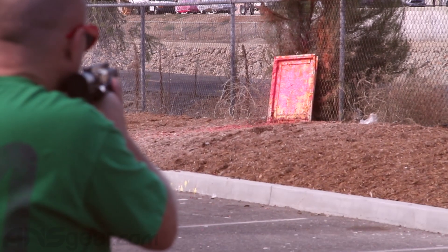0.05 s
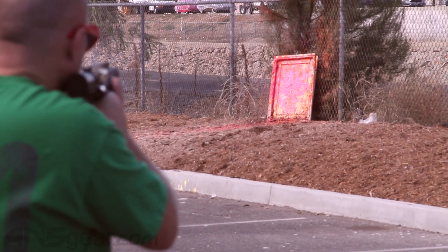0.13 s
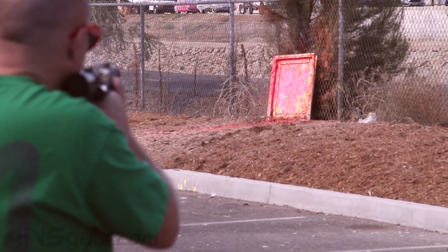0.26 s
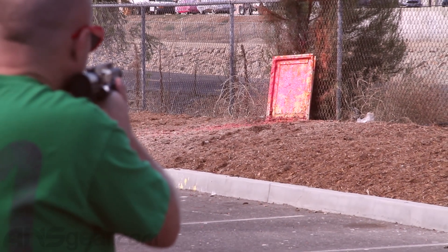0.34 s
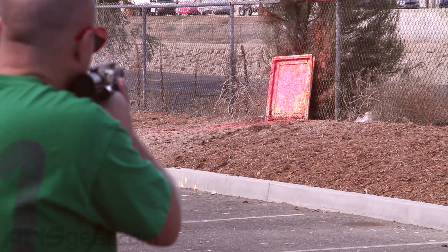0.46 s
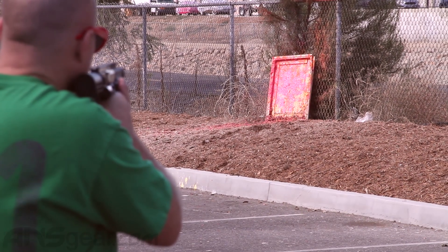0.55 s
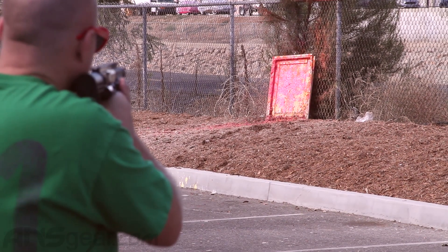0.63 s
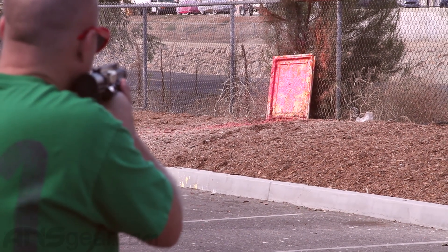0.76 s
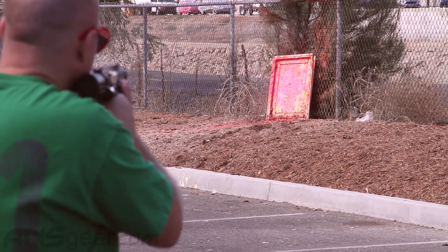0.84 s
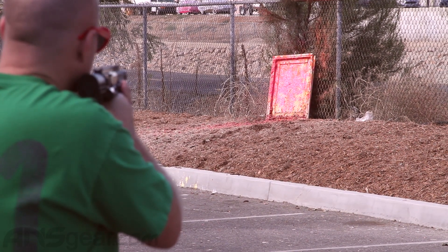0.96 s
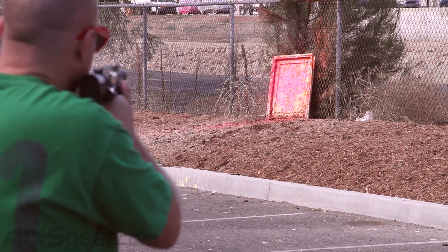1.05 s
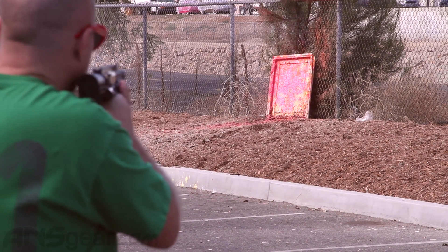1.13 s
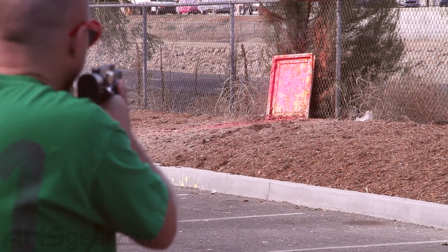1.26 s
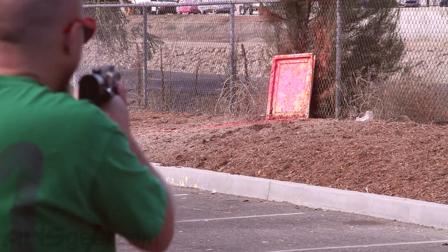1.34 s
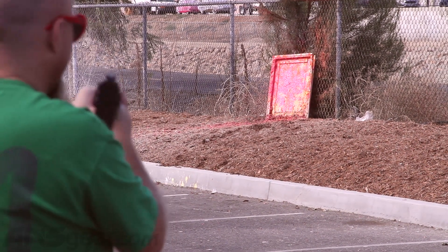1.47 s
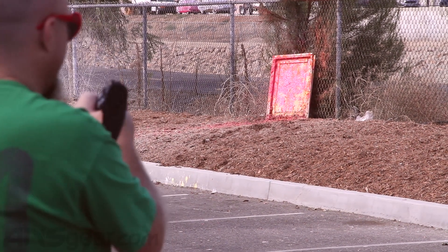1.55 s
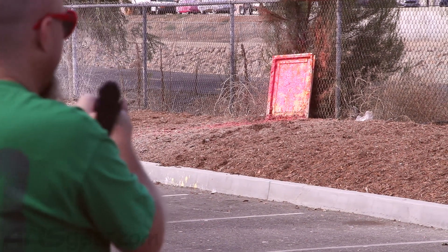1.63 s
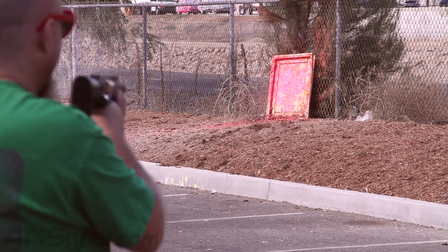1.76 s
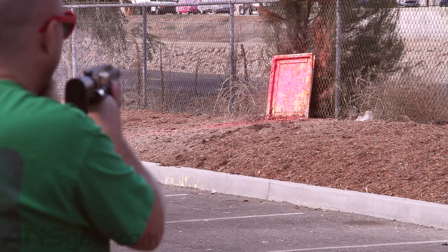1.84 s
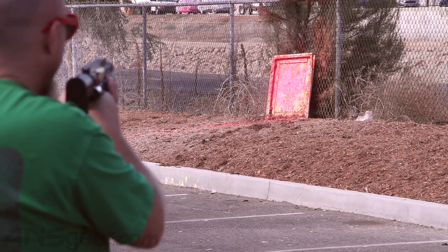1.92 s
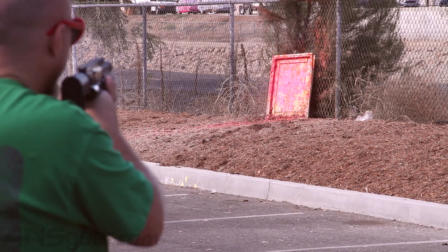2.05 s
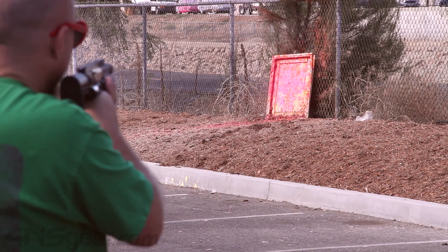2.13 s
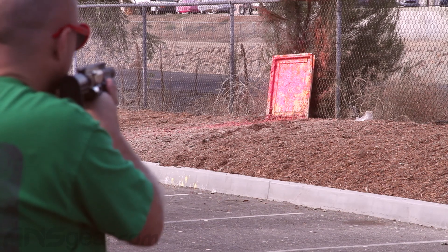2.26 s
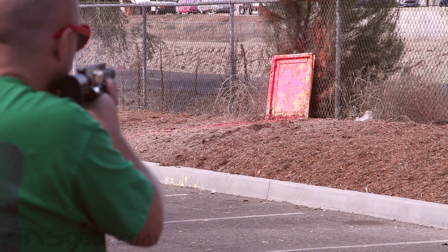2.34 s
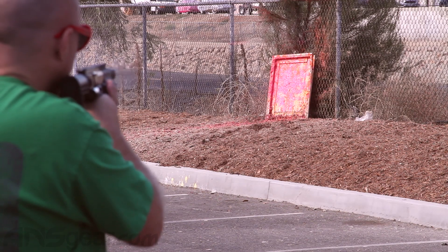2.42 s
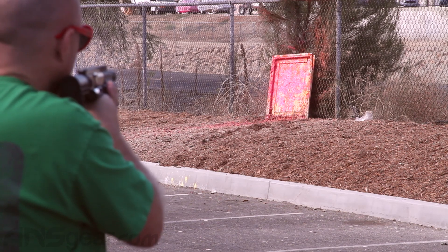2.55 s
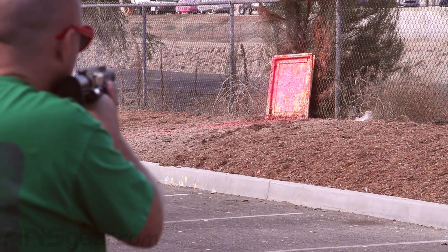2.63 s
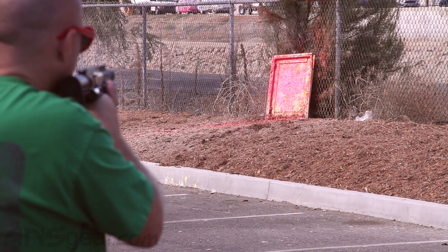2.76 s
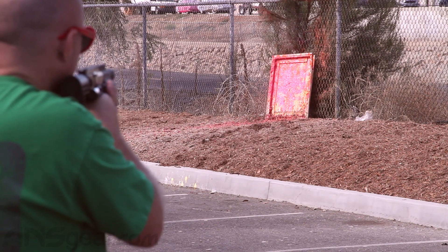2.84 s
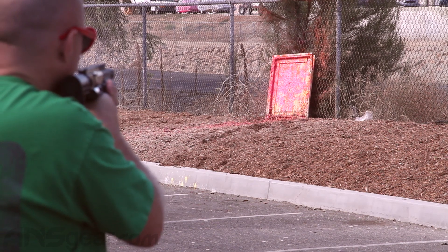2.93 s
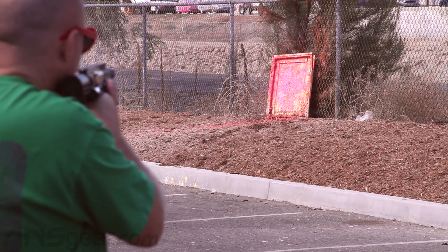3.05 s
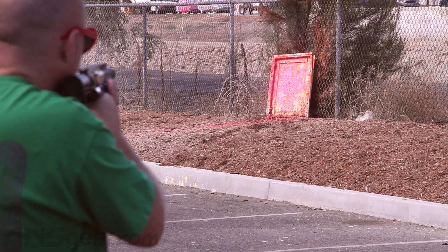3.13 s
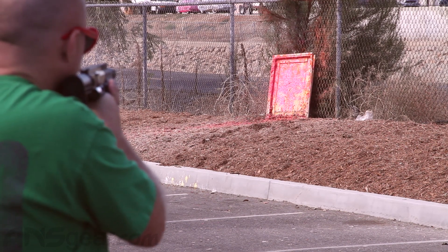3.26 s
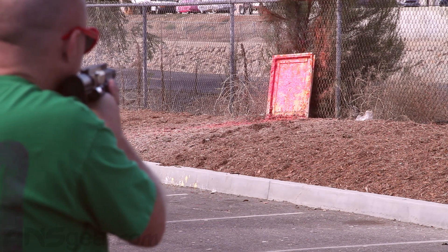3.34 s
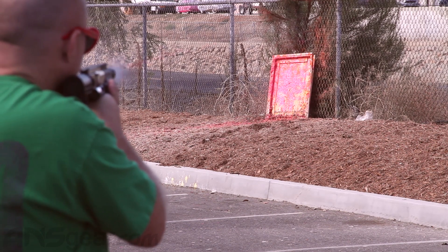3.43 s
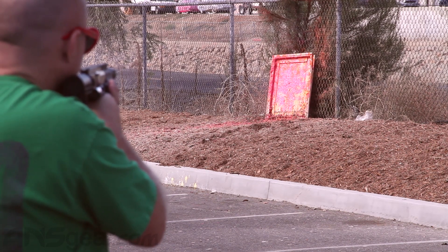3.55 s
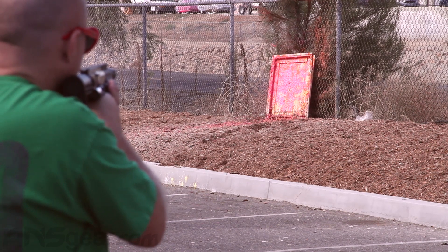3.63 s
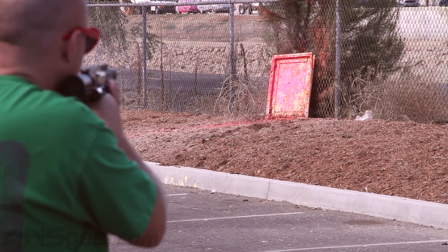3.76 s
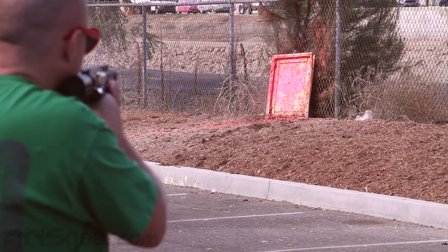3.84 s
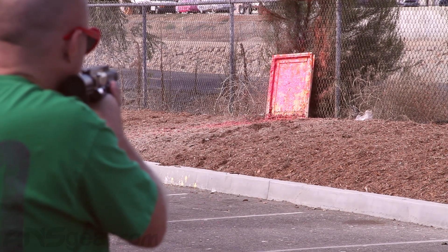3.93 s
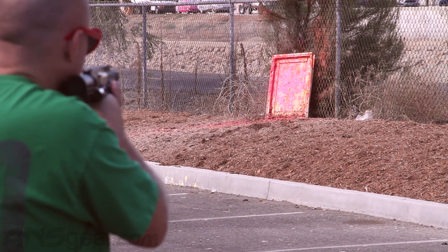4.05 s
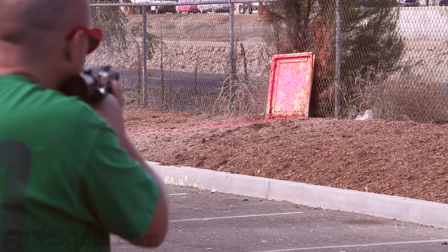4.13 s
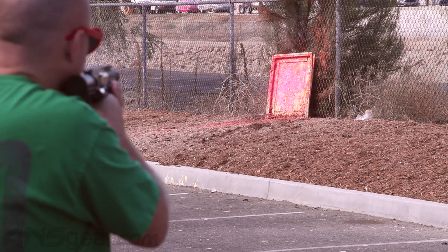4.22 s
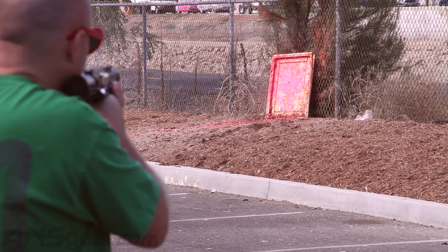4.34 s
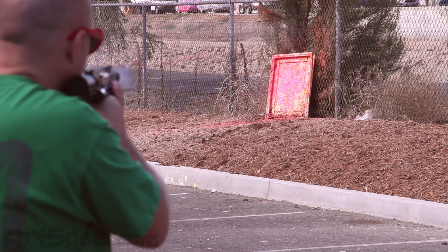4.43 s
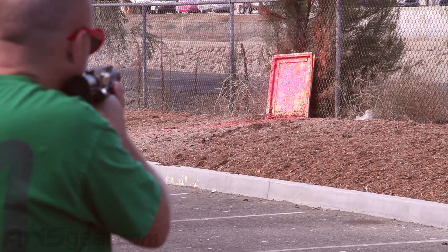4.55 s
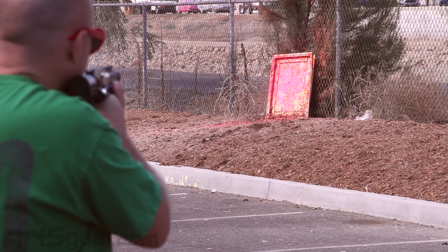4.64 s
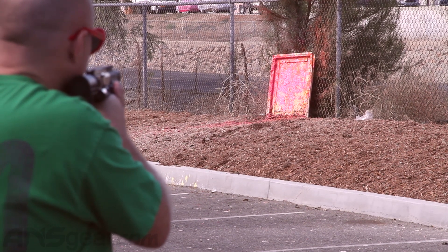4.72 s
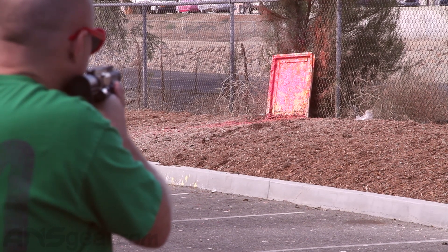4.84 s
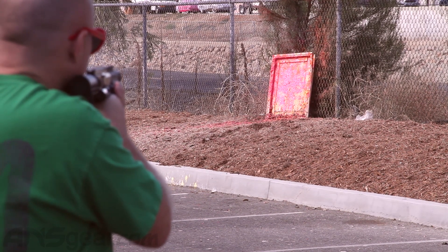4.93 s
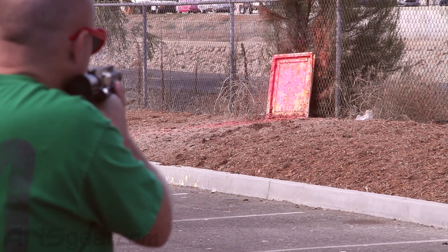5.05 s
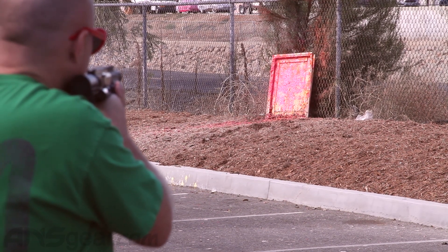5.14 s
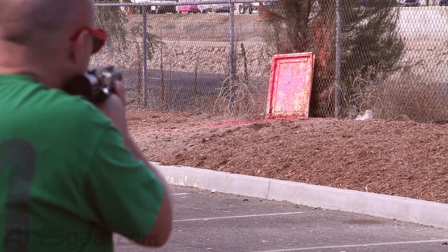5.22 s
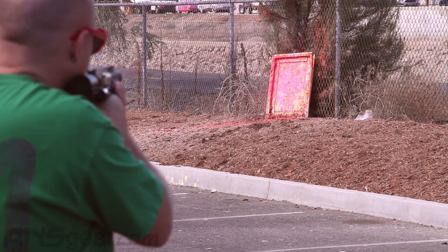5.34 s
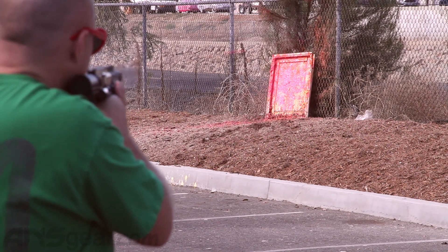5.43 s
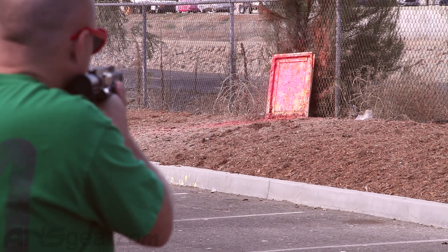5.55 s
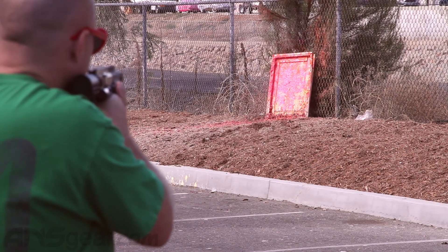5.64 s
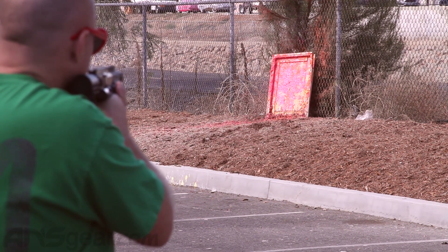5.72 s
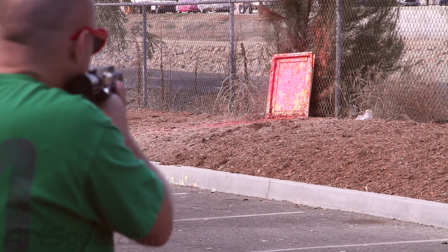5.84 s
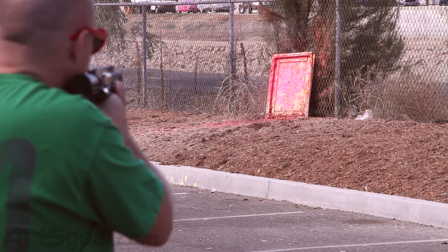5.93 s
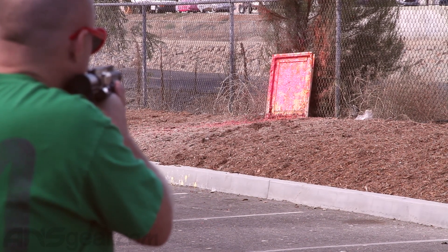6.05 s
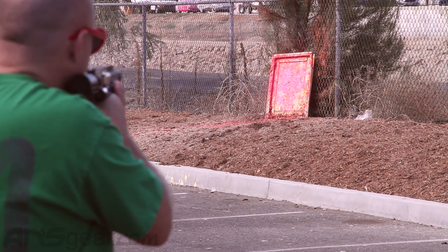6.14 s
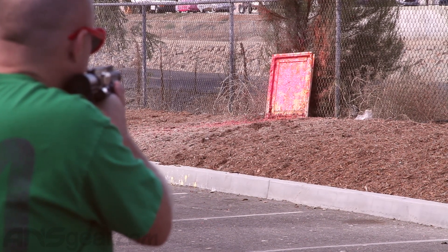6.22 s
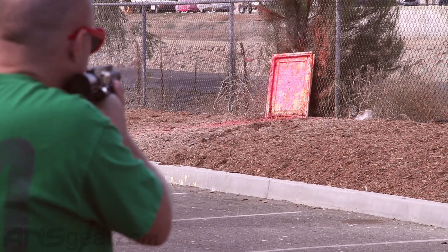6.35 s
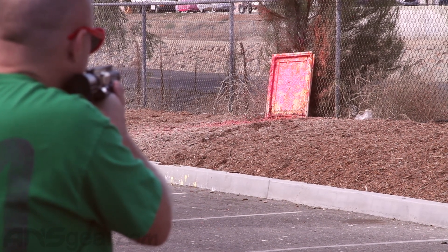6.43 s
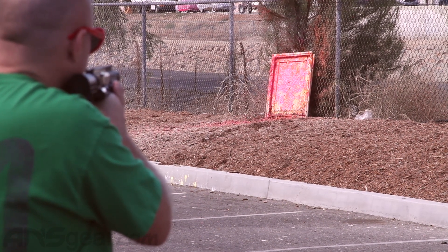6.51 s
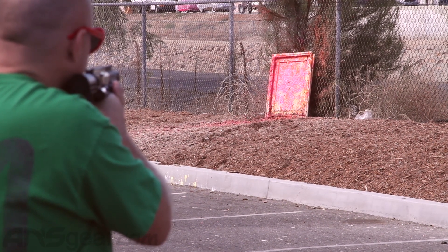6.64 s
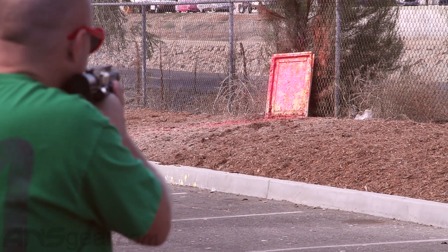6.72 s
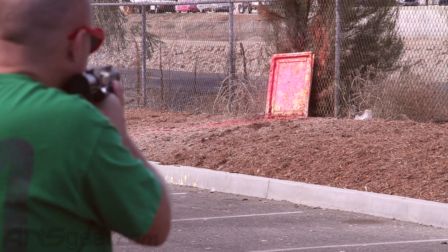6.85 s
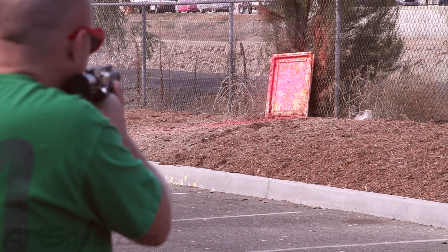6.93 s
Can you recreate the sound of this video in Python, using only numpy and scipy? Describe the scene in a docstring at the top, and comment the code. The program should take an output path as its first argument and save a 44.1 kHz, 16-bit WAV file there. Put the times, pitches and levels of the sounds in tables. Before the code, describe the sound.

Metal clicks, then five loud paintball pops about a second apart, with mechanical resets and far splats over light wind and traffic.

```python
"""Close to the microphone, a lever clicks as a CO2 paintball gun is readied, over wind and far traffic.
Then five shots cross a car park to a board by a fence. Each is a trigger tick, a valve leak and a blast
of gas that overloads the input; the bolt knocks, the action resets with two clicks, and far off the
ball splats. Distant walls return faint ticks, and a small bird calls once."""
import sys
import numpy as np
from scipy import signal
from scipy.fft import rfft, irfft
from scipy.io import wavfile
from scipy.ndimage import uniform_filter1d

SR = 44100
rng = np.random.default_rng(int(sys.argv[2]) if len(sys.argv) > 2 else 0)


def wav_out(sig):
    """Save sig, one row per channel (or a flat mono array), as 16-bit PCM at SR to the path in sys.argv[1]."""
    wavfile.write(sys.argv[1], SR, np.round(np.clip(np.atleast_2d(sig).T, -1, 1) * 32767).astype(np.int16))


N = 307818

# Levels in the tables are relative: each layer adds its own gain.
# Spectra of the place. Each row: frequency in Hz, level in dB.
WIND_SPECTRUM = [(8.8, -42.5), (15, -4), (38, 5.5), (81, 3), (210, -10.5), (309, -21), (506, -28),
                 (600, -30), (780, -52.5), (1320, -120)]
GUST_SPECTRUM = [(60, -11), (160, 3.5), (260, -4), (450, -14), (900, -35), (2000, -72)]
TRAFFIC_SPECTRUM = [(100, -4), (400, -3), (700, 2.5), (1100, 5.5), (1600, -1.5), (2200, -14.5), (3200, -24),
                    (5000, -32), (7500, -32.5), (9500, -28.5), (11500, -39.5), (15500, -46), (17000, -58)]
TYRE_SPECTRUM = [(1200, -20.5), (2500, 1), (3800, -4.5), (4600, -11.5), (7000, -26), (12000, -44)]
SPLAT_SPECTRUM = [(150, -9), (450, -3), (900, -2), (1600, 1), (3000, -6), (4200, -13.5), (7000, -18.5),
                  (9300, -1.5), (11000, -21.5), (16000, -40)]
SPRAY_SPECTRUM = [(400, 4.5), (1500, 1), (3000, -2.5), (4500, -10), (7500, -10), (9500, -2.5), (11000, -22),
                  (13000, -24), (16000, -42)]
# Spectra of cloth, clicks and gas at the gun. Each row: frequency in Hz, level in dB.
CLOTH_SPECTRUM = [(1000, -12), (3000, -11), (7000, -13.5), (8800, -2.5), (9900, 0), (11500, -11.5),
                  (15500, -25.5), (17000, -45.5)]
CLICK_SPECTRUM = [(200, -35.5), (600, -21), (900, -11.5), (1170, 4), (1420, -3), (1750, -0.5), (2300, -8),
                  (2750, -8.5), (3350, -0.5), (3800, -10), (4400, -12), (5400, -12.5), (6800, -13.5),
                  (8800, -3), (10600, -13), (15500, -28), (17000, -59.5)]
JET_SPECTRUM = [(60, -18), (300, -5.5), (900, -4.5), (1600, 1.5), (2300, -2.5), (3200, -2.5), (4500, -10),
                (7200, -11), (8400, -3), (9300, 2.5), (10000, -1), (10900, -15.5), (14000, -19.5),
                (17000, -36.5)]
NEAR_SCATTER_SPECTRUM = [(60, -3.5), (200, -17.5), (400, -8), (700, -3), (1300, 3.5), (2200, -4),
                         (3200, -5), (4500, -9), (7200, -11), (9400, -1), (11000, -12), (15500, -27),
                         (16500, -58)]  # the jet off the nearby surroundings
FAR_SCATTER_SPECTRUM = [(100, -7.5), (600, -3), (1200, 0), (2200, -7), (4000, -11.5), (7000, -15.5),
                        (9400, -4), (10800, -20), (13000, -37.5), (16000, -49.5)]  # the jet back from fence and trees
# Wind at the microphone and tyre hiss from the far road. Each row: time in seconds, level in dB.
WIND_LEVELS = [(0.0, -41), (1.48, -42), (1.65, -39), (2.39, -36), (2.55, -41), (3.05, -43), (3.62, -40),
               (4.24, -42), (4.61, -35), (4.84, -39), (6.36, -34), (6.98, -43)]
TYRE_LEVELS = [(0, -76), (1.1, -71), (1.6, -75), (3, -78), (3.8, -69), (5.3, -65.5), (6.1, -71),
               (6.98, -71)]
# Gusts on the microphone; sleeve and hands on the gun.
# Each row: centre in seconds, level in dB, half length in seconds.
GUST_SWELLS = [(1.7, -48, .1), (2.15, -49, .029), (2.29, -38, .04), (4.05, -48, .04), (4.25, -48, .06),
               (4.72, -44, .04), (5.08, -49, .06), (5.61, -41, .045), (5.93, -44, .05), (6.07, -39.5, .05),
               (6.82, -47, .06)]
CLOTH_SWELLS = [(.22, -62.5, 0.065), (1.075, -66, 0.025), (1.44, -70, .04), (1.499, -47.5, 0.025),
                (1.778, -62, 0.026), (1.903, -70, .06), (2.17, -76.5, .12), (2.859, -64, 0.066)]
# The car park's reverberation. Each row: frequency in Hz, seconds to fall 60 dB.
CAR_PARK_DECAY = [(100, .35), (500, .4), (1200, 0.5), (3500, 0.26), (9500, 0.17), (15000, 0.33)]
# The bird's falling note. Each row: time in seconds, pitch in Hz, level in dB.
BIRD_NOTE = [(4.107, 5450, -80), (4.125, 5264, -65), (4.143, 4850, -58), (4.160, 4310, -74.5),
             (4.190, 3536, -79.5)]
# Balls bursting on the far board. Each row: start in seconds, then level, treble and spray in dB.
BOARD_HITS = [(2.807, -17.5, 0, -77), (3.846, -16, -3.5, -64), (4.838, -4, -21.5, -50.5),
              (5.8, -9.5, -25.5, -56.5), (6.6835, -8.5, -18.5, -54.5)]
# What rings in the gun. Each row: frequency in Hz, level in dB, seconds to fall 60 dB.
METAL_MODES = [(1150, 2.5, 0.083), (2350, -19, .1), (2850, -21.5, .16), (3330, -7.5, 0.066),
               (3850, -25.5, .26), (4900, -23.5, .12), (6370, -25, .14), (7720, -20, 0.16),
               (8600, -21, .09)]  # thin metal parts
SPRING_MODES = [(2665, -3, .32), (3838, 0, .46), (6315, -7, .4), (8355, -4, .34), (8640, -9, .6)]  # the sear's spring
FRAME_MODES = [(746, -13, 0.01), (1168, -1, 0.036), (1310, -7.5, 0.013), (1390, -5.5, 0.015),
               (1820, -6, 0.013), (2638, -11.5, .016), (3058, -7.5, 0.018)]  # the frame under the bolt
BARREL_MODES = [(115, 4, 0.017), (242, -2.5, 0.016), (376, 7.5, 0.027), (498, 7, 0.033), (551, 6.5, .026),
                (717.7, 5, .035), (1484, -2, 0.044), (1870, -0.5, 0.046)]  # air in the barrel
# Lever strokes. Each row: time of the snap in seconds; level, treble and ring in dB;
# contact decay and travel in seconds; slack tick, catch tick and rebound in dB.
LEVER_STROKES = [(.027, -33, 5, -25, .0014, .02, -60, -60, -60),
                 (.245, -23, -20, -21, .0025, .066, -45, -33, -42),
                 (.497, -26, -7, -24, .0015, .061, -50, -50, -52),
                 (.732, -18.5, -15, -18, .0016, .037, -39, -32, -40),
                 (.849, -20, -15.5, -18, .0007, .031, -35, -42, -32),
                 (.993, -16.5, -13.5, -18, .0025, .027, -30, -35, -37),
                 (1.078, -18.5, -17, -15, .0009, .025, -35, -35, -28),
                 (1.202, -14, -1.5, -20, .001, .022, -28, -32, -40),
                 (1.277, -22.5, -8, -11, .0021, .025, -39, -37, -24),
                 (1.353, -2.5, 4, -30, .0008, .01, -60, -55, -10),
                 (1.39, -3.5, 4, -32, .0025, .01, -60, -55, -22),
                 (1.544, -29.5, -6, -22, .0021, .02, -60, -60, -55)]
# Gas flow, starting with the valve's leak. Each row: seconds from the blast, level in dB.
JET_LEVELS = [(-.0075, -59.5), (-.006, -21), (-.003, -23), (0, -14), (.001, -0.5), (.006, 0.5),
              (0.014, 3.5), (.015, -7), (.02, -11), (.032, -25), (.06, -34), (.12, -67.5)]
# The shots. Each row: start in seconds, level in dB, barrel hoot in dB, its rise in Hz, its length in
# seconds; bolt return delay and first bounce gap in seconds, bolt level in dB; trigger lead, release
# delay and latch delay after the release in seconds; latch level and treble in dB.
FIRINGS = [(2.4, -2, -13.5, 136, .037, .0531, .018, -11.5, .024, .154, .030, 0, 5.5),
           (3.4558, -.5, -17.5, 384, .052, .0506, .019, -7.5, .0228, .1272, .030, -1.5, -4),
           (4.4462, -1, -18.5, 303, .022, .0497, .016, -4.5, .0242, .1178, .032, -.5, -1),
           (5.4001, -1, -29, 294, .026, .0469, .0115, -7, .026, .1129, .035, 0, -2.5),
           (6.29, -1, -28, 650, .027, .0474, .009, -2.5, .027, .100, .034, -.5, -3)]
# Clicks of every shot. Each holds: level, treble and ring in dB, contact decay in seconds.
TRIGGER_CLICK = (-16.5, -6, -22, .0016)
RELEASE_CLICK = (-8, -9.5, -27, .0013)
SETTLE_CLICK = (-14.5, -7, -29, .0018)
# Two distant walls. Each row: echo delay in seconds, level in dB.
WALL_ECHOES = [(.3415, -42), (.6267, -44)]


def amp(db):
    """Decibels to gain."""
    return 10 ** (np.asarray(db) / 20)


def unit(x):
    """Scales to rms 1."""
    return x / np.sqrt(np.mean(x ** 2) + 1e-20)


def crest(x):
    """Scales a hit so that its loudest moment has rms 1."""
    return x / np.sqrt(uniform_filter1d(x ** 2, size=66).max())


def read(points, hz):
    """Reads a curve on a log-frequency axis."""
    f, value = np.transpose(points)
    return np.interp(np.log(hz + 1), np.log(f + 1), value)


def clock(count):
    """Times of count samples."""
    return np.arange(count) / SR


def add(mix, s, sound):
    """Mixes a sound in at s seconds."""
    part = mix[max(round(s * SR), 0):][:len(sound)]
    part += sound[:len(part)]


def noise(spectrum, count):
    """Coloured noise of rms 1."""
    gain = amp(read(spectrum, np.fft.rfftfreq(count, 1 / SR)))
    return unit(irfft(rfft(rng.standard_normal(count)) * gain, count))


def wander(count, size):
    """Random drift of rms 1, smoothed over size samples."""
    return unit(uniform_filter1d(rng.standard_normal(count), size))


def swells(rows):
    """An envelope of bell-shaped rises and falls."""
    t = clock(N)
    return sum(amp(db) * np.exp(-((t - s) / half) ** 2 / 2) for s, db, half in rows)


def colour(x, spectrum, treble_db, size=4096):
    """Causal filter: a body's response, its top tilted by a share of treble_db."""
    hz = abs(np.fft.fftfreq(size, 1 / SR))
    treble_share = read([(3500, .057), (7500, .69)], hz)
    log_gain = np.log(amp(read(spectrum, hz) + treble_db * treble_share))
    response = np.fft.ifft(np.exp(np.conj(signal.hilbert(log_gain)))).real  # minimum phase
    return signal.fftconvolve(x, response[:size // 2])[:len(x)]


def ring(modes, t, spread, uneven_db):
    """Damped modes, slightly different in pitch and strength at each blow."""
    chance = rng.standard_normal((len(modes), 2))
    return sum(amp(db + uneven_db * force - 60 * t / t60)
               * np.sin(2 * np.pi * hz * (1 + spread * detune) * t)
               for (hz, db, t60), (force, detune) in zip(modes, chance))


def contact(t, rise_s, fall_s, rattle_db, rattle_t60):
    """Force of a rough contact: a short burst and a weaker rattle after it."""
    attack = 1 - np.exp(-(t / rise_s) ** 2)
    decay = np.exp(-t / fall_s) + amp(rattle_db - 60 * t / rattle_t60)
    return rng.standard_normal(len(t)) * attack * decay


def wind():
    """Wind buffets the microphone: a lumpy rumble that brightens in gusts."""
    level_db = np.interp(clock(N), *np.transpose(WIND_LEVELS)) + 1.3
    lumps = amp(1.2 * wander(N, size=3000))
    breeze = amp(level_db) * noise(WIND_SPECTRUM, N)
    gusts = swells(GUST_SWELLS) * noise(GUST_SPECTRUM, N)
    return lumps * (breeze + gusts)


def traffic():
    """The far road: a steady wash, with tyre hiss that comes and goes."""
    tyres_db = np.interp(clock(N), *np.transpose(TYRE_LEVELS)) - 3.5
    return amp(-50.2) * noise(TRAFFIC_SPECTRUM, N) + amp(tyres_db) * noise(TYRE_SPECTRUM, N)


def car_park(x):
    """Fence, trees and ground scatter a sound into a short tail."""
    hz, t, bands = signal.stft(rng.standard_normal(SR // 2), SR, nperseg=256)
    decay = amp(-60 * t / read(CAR_PARK_DECAY, hz)[:, None])
    onset = 1 - np.exp(-t / .0063)
    _, tail = signal.istft(bands * decay * onset, SR, nperseg=256)
    return signal.fftconvolve(x, tail / np.linalg.norm(tail))[:N]


def bird():
    """Some way off, a thin, wavering, falling whistle with its octave."""
    s, hz, db = np.transpose(BIRD_NOTE)
    t = np.arange(s[0], s[-1], 1 / SR)
    pitch_hz = np.interp(t, s, hz) * (1 + .022 * wander(len(t), size=40))
    phase = 2 * np.pi * np.cumsum(pitch_hz) / SR
    out = np.zeros(N)
    add(out, s[0], amp(np.interp(t, s, db)) * (np.sin(phase) + amp(-7.5) * np.sin(2 * phase)))
    return out


def far_tick(db):
    """A sharp contact, faint with distance."""
    force = contact(clock(4096), rise_s=.00031, fall_s=.0013, rattle_db=-21.5, rattle_t60=.03)
    return amp(db - 2) * crest(colour(force, SPRAY_SPECTRUM, treble_db=-7))


def wall_echoes():
    """Distant walls return the crack of each shot as small ticks."""
    out = np.zeros(N)
    for s, *_ in FIRINGS:
        for delay_s, db in WALL_ECHOES:
            add(out, s + delay_s, far_tick(db))
    return out


def splats():
    """Across the car park, each ball cracks on the board and sprays droplets into the brush."""
    out, t = np.zeros(N), clock(16000)
    spray_peak_s, drops_per_s = .068, 1600
    age = t / spray_peak_s
    for s, db, treble_db, spray_db in BOARD_HITS:
        force = contact(t, rise_s=.00025, fall_s=.0012, rattle_db=-16.5, rattle_t60=.024)
        crack = crest(colour(force, SPLAT_SPECTRUM, treble_db + 10))
        drops = rng.standard_normal(len(t)) * (rng.random(len(t)) < drops_per_s / SR)
        spray = unit(colour(drops, SPRAY_SPECTRUM, treble_db=5.5)) * age * np.exp((1 - age ** 2) / 2)
        add(out, s, amp(db - 14) * crack + amp(spray_db) * spray)
        add(out, s + .0315, far_tick(db - 24))  # echo off the bank behind the board
        for after_s in rng.uniform(.012, .07, size=3):  # bits of shell drop, later ones more softly
            add(out, s + after_s, far_tick(db - 29 - 130 * after_s))
    return out


def rustles():
    """Grainy friction up close: cloth slides on the gun, and the trigger scrapes before it breaks."""
    grain = unit(amp(3.5 * wander(N, size=100)))
    lead_s, scrape_db, half_s = .005, -45.5, .0038
    scrapes = [(s - break_s - lead_s, scrape_db, half_s) for s, *_, break_s, _, _, _, _ in FIRINGS]
    cloth = swells(CLOTH_SWELLS) * noise(CLOTH_SPECTRUM, N)
    trigger = swells(scrapes) * noise(CLICK_SPECTRUM, N)
    return grain * (cloth + trigger)


def click(db, treble_db, ring_db=-26, fall_s=.0015):
    """A small metal part snaps against the gun's body; the grip damps its ring more or less."""
    t = clock(12000)
    force = contact(t, rise_s=.00099, fall_s=fall_s, rattle_db=-23.5, rattle_t60=.035)
    snap = crest(colour(force, CLICK_SPECTRUM, treble_db + 7))
    metal = ring(METAL_MODES, t, spread=.0079, uneven_db=4.5)
    return amp(db - 8.5) * (snap + amp(ring_db) * metal)


def lever():
    """Each stroke of the lever takes up its slack, passes a catch, snaps home and rebounds."""
    out = np.zeros(N)
    for s, db, treble_db, ring_db, fall_s, travel_s, slack_db, catch_db, rebound_db in LEVER_STROKES:
        add(out, s - travel_s, click(slack_db, treble_db=-25))
        add(out, s - .32 * travel_s, click(catch_db, treble_db=-1))
        add(out, s, click(db, treble_db, ring_db, fall_s))
        add(out, s + .0105, click(rebound_db, treble_db - 11, fall_s=fall_s))
    return out


def action():
    """The trigger breaks, then clicks as it is let go; the sear latches and settles, its spring singing."""
    out = np.zeros(N)
    for s, *_, break_s, release_s, latch_s, latch_db, latch_treble_db in FIRINGS:
        latched = s + release_s + latch_s
        add(out, s - break_s, click(*TRIGGER_CLICK))
        add(out, s + release_s, click(*RELEASE_CLICK))
        add(out, latched, click(latch_db, latch_treble_db, ring_db=-28, fall_s=.0018))
        add(out, latched, amp(-62) * ring(SPRING_MODES, clock(24000), spread=.001, uneven_db=3))
        add(out, latched + .008, click(*SETTLE_CLICK))
    return out


def knock(db, treble_db):
    """The bolt strikes the frame, which rings hollow, with its low end cut away."""
    t = clock(4096)
    no_bass = signal.butter(3, 800, "highpass", fs=SR, output="sos")
    frame = ring(FRAME_MODES, t, spread=.03, uneven_db=4) * (1 - np.exp(-(t / .00096) ** 2))
    body = crest(signal.sosfilt(no_bass, frame))
    force = contact(t, rise_s=.0014, fall_s=.0014, rattle_db=-25.5, rattle_t60=.015)
    edge = crest(colour(force, CLICK_SPECTRUM, treble_db=-17))
    return amp(db - 5) * (body + amp(treble_db + 3.5) * edge)


def bolt():
    """The bolt hits its rear stop, returns and bounces, each time sooner and softer."""
    out = np.zeros(N)
    rear_stop_s, gap_ratio, loss_db = .0252, .68, 8.5
    for s, _, _, _, _, return_s, gap_s, bolt_db, *_ in FIRINGS:
        add(out, s + rear_stop_s, knock(db=-9.5, treble_db=4.5))
        for bounce in range(3):
            after_s = return_s + gap_s * (1 - gap_ratio ** bounce) / (1 - gap_ratio)
            add(out, s + after_s, knock(bolt_db - bounce * loss_db, treble_db=-13))
    return out


def hoot(rise_hz, length_s, start_hz):
    """Air replaces the heavy CO2 in the barrel, so its hollow tone climbs."""
    progress = np.linspace(0, 1, int(length_s * SR))
    phase = 2 * np.pi * np.cumsum(start_hz + rise_hz * progress ** 3) / SR
    envelope = amp(-5 * progress) * signal.windows.tukey(len(progress), .3)
    return (np.sin(phase) + np.sin(2 * phase)) * envelope


def blast_wave(t, push_s):
    """A push of pressure, then a longer suction."""
    age = np.maximum(t, 0) / push_s
    return (t > 0) * (1 - age) * np.exp(-age)


def shots():
    """Right by the microphone, gas bursts out: blast wave, ringing barrel, jet and its scatter."""
    out, t = np.zeros(N), clock(24000)
    flow_s, flow_db = np.transpose(JET_LEVELS)
    flow = amp(np.interp(t + flow_s[0], flow_s, flow_db, right=-200))
    direct = amp(10.5) * blast_wave(t, push_s=.0012)
    off_asphalt = amp(10) * blast_wave(t - .0075, push_s=.0016)
    for s, db, hoot_db, rise_hz, hoot_s, *_ in FIRINGS:
        barrel = ring(BARREL_MODES, t, spread=.034, uneven_db=1)
        add(out, s, -amp(db) * (direct + off_asphalt + barrel))
        add(out, s, amp(hoot_db) * hoot(rise_hz, hoot_s, start_hz=516))
        add(out, s + flow_s[0], amp(db) * flow * noise(JET_SPECTRUM, len(t)))
        near = amp(-12 - 60 * t / .27 - (t / .055) ** 2) * noise(NEAR_SCATTER_SPECTRUM, len(t))
        far = amp(-34 - 60 * t / .6) * noise(FAR_SCATTER_SPECTRUM, len(t))
        add(out, s, amp(db) * (near + far) * (1 - np.exp(-t / .012)))
    return out


def scene():
    """One microphone beside the gun; the board, the walls and the bird farther off."""
    close = lever() + action() + bolt()
    far = splats() + wall_echoes() + bird()
    blasts = shots()
    scatter = car_park(amp(-36) * close + amp(-14) * far)
    return (blasts + close + far + scatter + rustles() + wind() + traffic())[None]


def record(dry):
    """The microphone's input stage clips on every blast, and the band ends at 16 kHz."""
    clipped = np.clip(dry, -1, 1)
    lowpass = signal.firwin(255, 16000, window=("kaiser", 7), fs=SR)
    return signal.oaconvolve(clipped, lowpass[None], "same")


dry = scene()
out = record(dry)
wav_out(out)
```